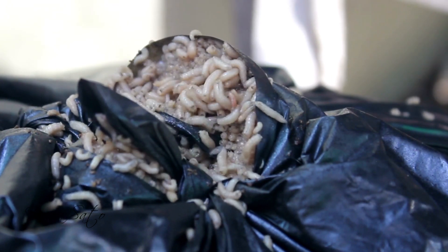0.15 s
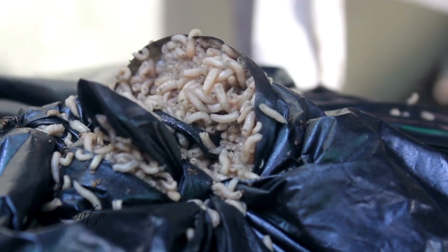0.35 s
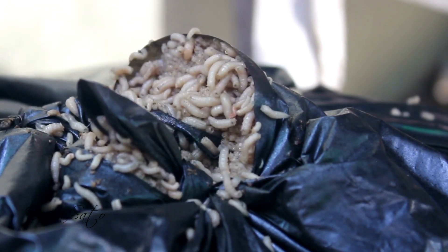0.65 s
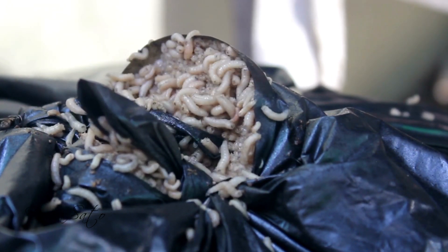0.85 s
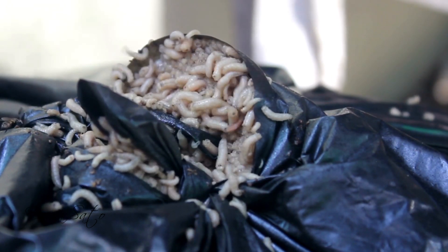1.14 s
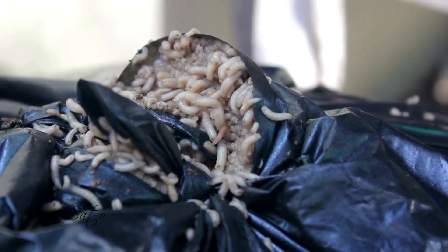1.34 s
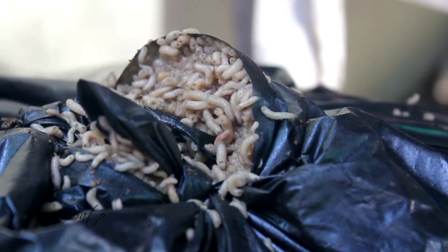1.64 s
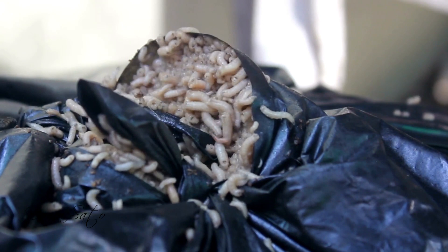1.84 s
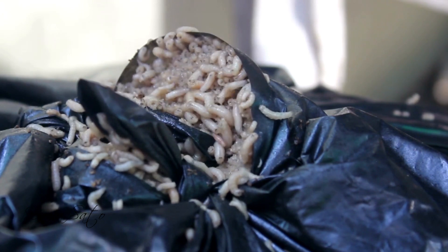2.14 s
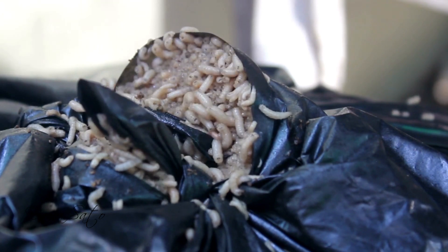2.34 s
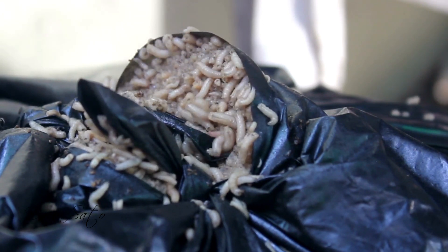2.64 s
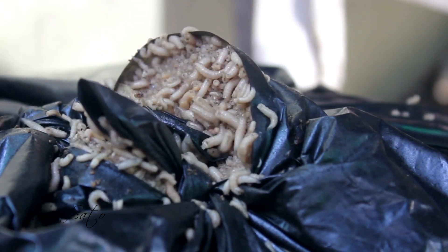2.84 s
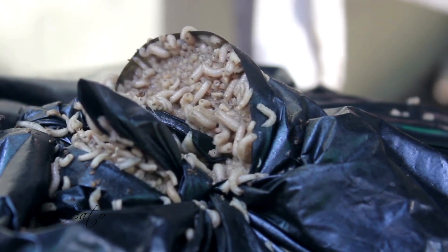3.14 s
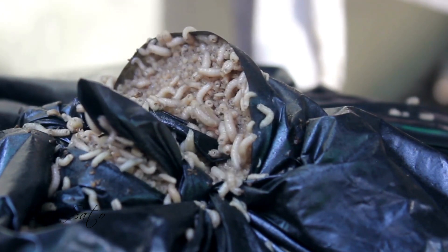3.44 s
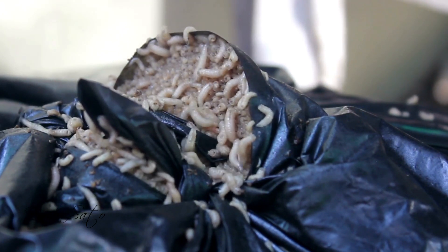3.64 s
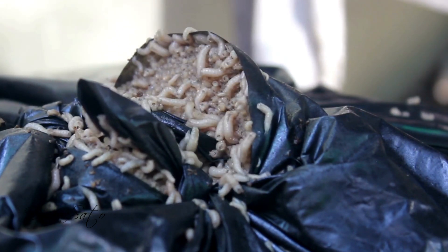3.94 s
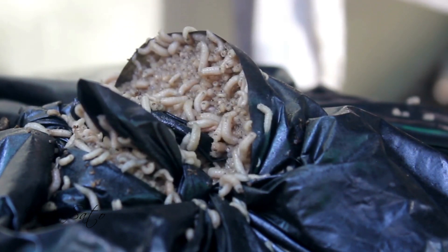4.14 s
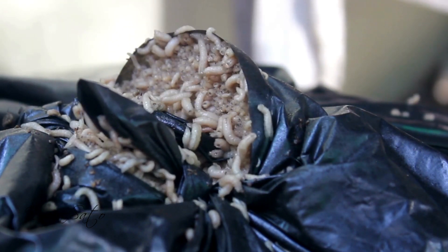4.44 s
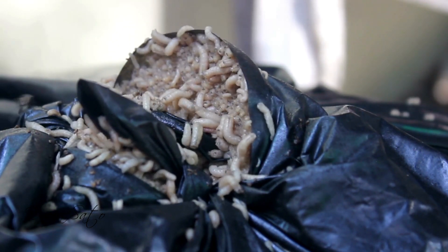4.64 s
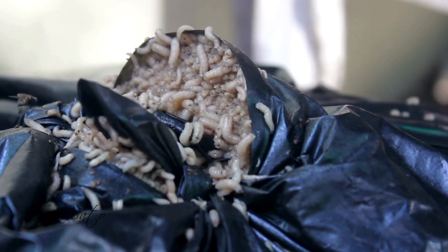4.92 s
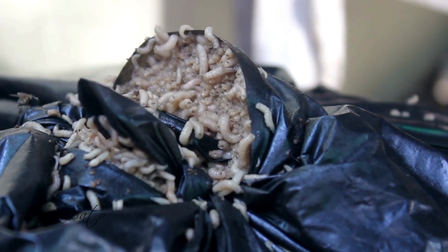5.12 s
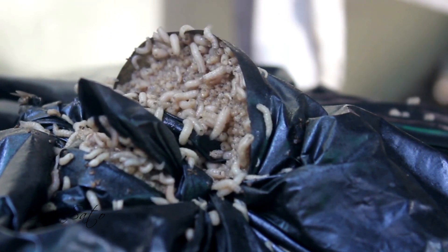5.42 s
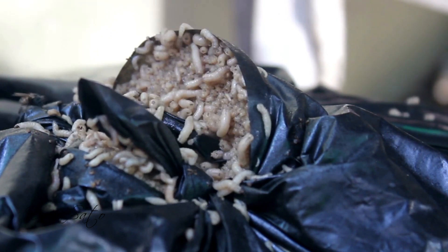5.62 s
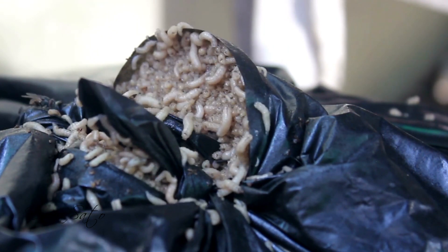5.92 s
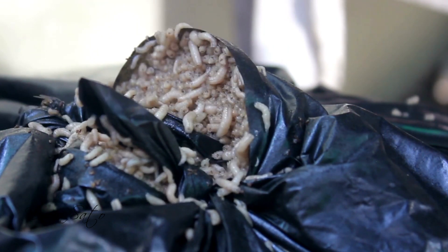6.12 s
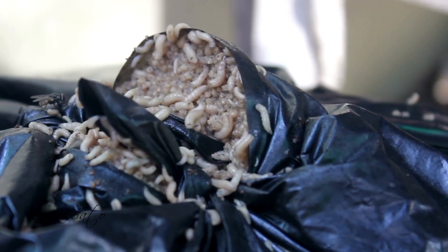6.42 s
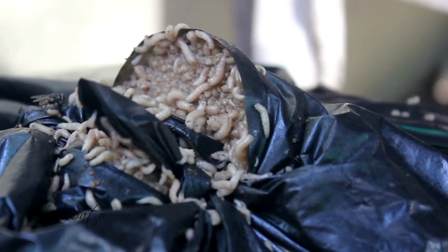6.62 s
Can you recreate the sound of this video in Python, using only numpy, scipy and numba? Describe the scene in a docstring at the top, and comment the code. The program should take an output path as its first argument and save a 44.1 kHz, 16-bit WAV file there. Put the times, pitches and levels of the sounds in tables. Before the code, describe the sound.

Very close stereo pickup of small larvae squirming in damp bran inside a plastic bag. Thousands of tiny wet pops a second merge into an even, bright crackle over a soft hiss, like fine rain or fizz. Irregular sharper snaps jump out on both sides, with minute echoes in the plastic folds. The texture runs unbroken from start to end, with no background activity.

```python
"""Small larvae wriggle in a heap of damp bran inside a plastic bag, close to a stereo microphone.
Sticky contacts part and flakes snap: thousands of tiny pops a second, each a sine that swells and dies in a few cycles.
Nearby pops stand out with a snap, shreds and short echoes among the folds; brief gliding whistles join them.
The farthest pops blur into a hiss, made of patchy noise whose treble flickers."""
import sys
import numpy as np
from scipy import signal
from scipy.fft import rfft, irfft, next_fast_len
from scipy.io import wavfile
from scipy.ndimage import uniform_filter1d, map_coordinates
from numba import njit

SR = 44100
rng = np.random.default_rng(int(sys.argv[2]) if len(sys.argv) > 2 else 0)


def to_wav(sig):
    """Store sig (one row per channel, or 1-D mono) as 16-bit WAV at the path in sys.argv[1].

    Samples outside -1..1 are clipped; the rate is SR.
    """
    pcm = np.clip(np.atleast_2d(sig), -1, 1) * 32767
    pcm = np.round(pcm).astype(np.int16)
    wavfile.write(sys.argv[1], SR, pcm.T)  # frames by channels


N = 298557  # samples


def amp(db):
    """Decibels to an amplitude factor."""
    return 10 ** (np.asarray(db) / 20)


def unit(x):
    """Scale x to an RMS of 1."""
    return x / np.sqrt(np.mean(x ** 2) + 1e-20)


def along(points, hz):
    """Read (Hz, value) points on a log frequency axis."""
    point_hz, value = np.transpose(points)
    return np.interp(np.log(hz + 1), np.log(point_hz + 1), value)


def curves(rows):
    """One value per sample for each column after the time."""
    s, *columns = np.transpose(rows)
    return [np.interp(np.arange(N) / SR, s, column) for column in columns]


def wobble(rate):
    """A smooth random curve, rate knots a second."""
    knots = rng.standard_normal(int(N * rate / SR) + 4)
    return map_coordinates(knots, [np.arange(N) * rate / SR])


def patches(s, hz, rate, per_octave):
    """A smooth random field over time and pitch, read at each pop; rate is in knots a second."""
    knots = rng.standard_normal((int(N * rate / SR) + 4, 24))
    return map_coordinates(knots, [s * rate, np.log2(hz / 100) * per_octave])


def filtered(x, response):
    """x times a response of frequency."""
    m = next_fast_len(N + 8192)
    return irfft(rfft(x, m) * response(np.fft.rfftfreq(m, 1 / SR)), m)[..., :N]


@njit
def add_rings(out, peak, step, rise, left, right):
    """Sines that swell for rise samples and die away, each summed into both channels."""
    for k in range(len(peak)):
        first = peak[k] - rise[k]
        for n in range(max(int(first) + 1, 0), min(int(first + 8 * rise[k]), out.shape[1])):
            u = (n - first) / rise[k]
            v = u * np.exp(1 - u) * np.sin(step[k] * (n - first))
            out[0, n] += left[k] * v
            out[1, n] += right[k] * v


def pops(s, db, hz, cycles, pan_db, sign):
    """Stereo sum of pops whose swell peaks at s after 0.4 * cycles of ringing, one sample at least."""
    out, lean = np.zeros((2, N)), amp(pan_db)
    size = sign * amp(db) * 2 / (1 + lean)  # the mean of both channels keeps the level
    rise = np.maximum(.4 * cycles / hz * SR, 1)
    add_rings(out, s * SR, 2 * np.pi * hz / SR, rise, size * lean, size)
    return out


# Activity of the whole heap, for crackle and hiss alike; positive pan is left.
# Columns: start_s [s], level_db [dB before the mix], pan_db [dB, left over right]
ACTIVITY = [(0, -31.5, 0), (.3, -31, 0.5), (1, -31, 1.5), (1.55, -30, -0.8), (2.1, -31.5, 0),
            (2.8, -32.5, -0.5), (3.15, -32.5, 0), (3.45, -31, 0), (3.78, -32.5, 1.5), (4, -31, -0.8),
            (4.38, -30.5, -1.5), (4.9, -31, -1), (5.18, -32.5, -1.5), (5.4, -30, 0.5), (5.7, -31.5, -0.5),
            (6.27, -31.5, -0.5), (6.32, -31.5, 2.5), (6.45, -30.5, 0.5), (6.5, -32.5, 0.5), (6.77, -30, 2)]
# Tone filter over the small pops. Columns: pitch_hz [Hz], gain_db [dB]
CRACKLE_COLOUR = [(40, -55), (120, -47), (300, -25.5), (550, -17.5), (1100, -7), (2600, 1.5), (5200, 7),
                  (8500, 9.5), (12000, 6), (15500, 7)]


def crackle(surge_db, count, centre_hz, octaves, cycles, spread_db, top_db, side_db, clump_db):
    """Countless small pops from the left, middle and right of the heap, louder in clumps of like pitch."""
    TILT_DB, TILT_DRIFT_DB, TILT_RATE = -0.87, 0.5, 4.12  # dB per octave, its random drift, knots a second
    when, size, place, sign = rng.random((count, 4)).T
    pitch, life, lean = rng.standard_normal((count, 3)).T
    at = (when * (N - 1)).astype(int)
    level_db, pan_db = (column[at] for column in curves(ACTIVITY))
    tilt_db = TILT_DB + TILT_DRIFT_DB * wobble(TILT_RATE)[at]
    hz = np.clip(centre_hz * 2 ** (octaves * pitch), 120, .4 * SR)
    strength_db = top_db * np.tanh(-spread_db * np.log(size + 1e-9) / top_db)  # random, held below top_db
    slow_clumps = patches(at / SR, hz, 12, 1.214)
    quick_clumps = patches(at / SR, hz, 40, 1.215)
    clumps = clump_db * (slow_clumps + 2.2 * quick_clumps)
    db = level_db + surge_db[at] + strength_db + clumps + tilt_db * np.log2(hz / 4000)
    pan = pan_db + side_db * np.round(3 * place - 1.5) + 1.6 * lean
    fizz = pops(at / SR, db, hz, cycles * np.exp(0.62 * life), pan, np.sign(sign - .5))
    fizz = unit(filtered(fizz, lambda f: amp(along(CRACKLE_COLOUR, f))))
    return fizz * np.sqrt(np.mean(amp(level_db) ** 2))


# Tone filter for the blur of far pops. Columns: pitch_hz [Hz], level_db [dB per Hz, relative]
HISS_COLOUR = [(18, -88), (30, -42), (98, -35.5), (569, -9), (1280, -2.5), (2610, 0.5), (5450, -1),
               (8740, -6.5), (14800, -15), (16000, -33)]
# Likeness of the hiss at the two sides. Columns: pitch_hz [Hz], likeness [1 = identical]
HISS_LIKENESS = [(60, 0.23), (240, 0.59), (950, 0.77), (3770, 0.82), (15000, 1)]


def hiss(patchy_db, flicker_db):
    """Pops too far and too many to tell apart: patchy noise whose treble flickers as a whole."""
    hz, t, z = signal.stft(rng.standard_normal((2, N)), SR, nperseg=512)
    field = uniform_filter1d(rng.standard_normal(z.shape[1:]), 8, 0)
    field = uniform_filter1d(field, 6, 1)
    flicker = np.interp(t * SR, np.arange(N), wobble(8) + 1.1 * wobble(22))
    gain_db = patchy_db * unit(field) + flicker_db * np.outer(hz / 12000, flicker)
    pair = signal.istft(z * amp(gain_db), SR, nperseg=512)[1][:, :N]

    def mid_side(f):
        turn = np.arccos(np.clip(along(HISS_LIKENESS, f), -1, 1)) / 2
        return amp(along(HISS_COLOUR, f)) * [np.cos(turn), np.sin(turn)]

    mid, side = filtered(pair, mid_side)
    level_db, pan_db = curves(ACTIVITY)
    return amp(level_db + np.outer([.5, -.5], pan_db)) * unit(np.array([mid + side, mid - side]))


# The loudest pops, close to the microphone; levels are for the ring alone, before filter and mix.
# Columns: peak_s [s], level_db [dB], pitch_hz [Hz], pan_db [dB, left over right]
NEAR_POPS = [(0.073, -18, 5700, 4), (0.1815, -21.5, 12750, -8), (0.235, -15, 11900, 4),
             (0.3875, -16, 10170, 1), (0.4071, -22, 13000, 0), (0.4424, -20, 6800, -8),
             (0.45, -15, 2740, 10), (0.4908, -13, 6790, -1), (0.53, -14, 7300, -5), (0.5303, -23, 2530, -4),
             (0.6327, -13, 10170, 1), (0.641, -19, 9700, 2), (0.7912, -12, 7600, -1),
             (0.8608, -13, 9000, 6), (0.891, -23.5, 1780, 6), (0.9052, -15, 9500, -9),
             (0.9063, -12, 4430, 0), (0.9112, -21, 11200, 0), (0.9226, -24, 1380, 10),
             (0.9238, -19, 4000, 0), (0.9347, -23, 3900, 0), (0.9435, -17, 3900, 0), (0.9497, -22, 5400, 0),
             (0.982, -12.5, 4170, -1), (1.029, -12, 10100, -12), (1.0849, -17, 12100, 15),
             (1.104, -15, 6400, 3), (1.2342, -7.5, 5600, 0), (1.2596, -11, 5800, 1),
             (1.2774, -16.5, 3400, 7), (1.2946, -14, 14380, 1), (1.3005, -13, 6860, 1),
             (1.3084, -23, 12260, 0), (1.36, -12.5, 6410, 0), (1.4094, -12, 8600, -4),
             (1.4149, -15.5, 4900, -12), (1.4501, -17, 10040, 1), (1.4683, -12, 4800, -1),
             (1.475, -15, 3920, 8), (1.5195, -18, 5500, 0), (1.5255, -21, 10500, 0), (1.538, -17, 4280, 14),
             (1.603, -13.5, 2130, -2), (1.6033, -23, 6600, 0), (1.6486, -21, 1920, -3),
             (1.6633, -14, 5090, 7), (1.675, -20, 7000, 0), (1.7032, -8.5, 3900, 7),
             (1.7089, -18, 11000, 10), (1.725, -20, 2670, -7), (1.736, -15, 4500, 0),
             (1.7395, -10, 4800, 6), (1.759, -20, 5200, 0), (1.825, -16, 6300, 0), (1.829, -7.5, 4530, 6),
             (1.8536, -14, 2670, -2), (1.8554, -8.5, 7160, 10), (1.86, -12, 4830, 6),
             (1.8694, -20, 2530, 0), (1.882, -13, 4770, 12), (1.976, -16, 5390, -2), (1.978, -15, 5090, 11),
             (2.022, -18, 13900, 0), (2.1921, -19, 14380, -14), (2.209, -25, 2550, 0),
             (2.248, -27, 1450, 0), (2.257, -28, 1150, 0), (2.2647, -24, 9550, 5), (2.267, -25, 1750, 0),
             (2.282, -28, 1050, 0), (2.37, -21, 2500, 0), (2.4023, -19, 5250, 8), (2.4095, -25, 6200, 0),
             (2.4262, -11, 8200, -1), (2.4465, -19, 6800, 0), (2.4511, -16, 7190, -3),
             (2.4653, -16, 10270, -4), (2.478, -23, 3500, 0), (2.499, -24, 8700, 0),
             (2.505, -11.5, 6850, -1), (2.505, -18, 3360, -2), (2.5277, -17, 6800, 6),
             (2.534, -14, 5600, 10), (2.5712, -18, 5750, 3), (2.7587, -15, 8550, -1),
             (2.8465, -19, 14380, -2), (2.8859, -17, 6500, 0), (3.0185, -19, 12600, 0),
             (3.0414, -34, 700, -1), (2.9685, -24, 3400, 0), (2.991, -23, 5000, 0), (3.0205, -23, 6100, 0),
             (3.0486, -19, 9500, -2), (3.0495, -21, 5000, 0), (3.0675, -24, 2700, 0),
             (3.0985, -18, 7900, -6), (3.1015, -19, 12080, 9), (3.1643, -16, 7000, 0),
             (3.1841, -18, 11000, -15), (3.2128, -19, 14380, -15), (3.273, -14, 5090, -2),
             (3.2739, -20, 1370, 0), (3.3273, -14, 6100, -7), (3.3494, -16, 4530, 1),
             (3.3802, -29.5, 920, -4), (3.3829, -15.5, 6640, 4), (3.4183, -19, 4630, 7),
             (3.4334, -29, 885, -8), (3.4677, -31.5, 760, -5), (3.486, -31.5, 790, -4),
             (3.5271, -15, 8100, 0), (3.5694, -28, 6600, 5), (3.667, -16, 4200, -1), (3.672, -13, 1620, -7),
             (3.7059, -20, 13000, 7), (3.7575, -15.5, 2510, -5), (3.759, -18.5, 1800, -4),
             (3.7635, -20, 3500, 0), (3.7835, -15, 9900, -8), (3.8262, -17, 6950, 4),
             (3.8397, -12.5, 6410, 11), (3.8974, -24, 1810, -10), (3.8964, -13.5, 6940, 10),
             (3.91, -20, 14300, -4), (3.9256, -16, 12810, 6), (3.999, -18, 4650, -1),
             (4.016, -21.5, 1530, -9), (4.0256, -7, 5400, -8), (4.031, -24, 1760, -11),
             (4.052, -9, 7500, -6), (4.06, -12.5, 8000, -6), (4.095, -10, 7930, 2),
             (4.096, -21.5, 1890, -9), (4.1517, -15, 6050, -16), (4.157, -25, 12500, 0),
             (4.18, -15, 4040, 12), (4.196, -23, 12450, 14), (4.21, -21, 12450, 14), (4.241, -12, 4820, 0),
             (4.2561, -17, 2310, -7), (4.2565, -18, 9730, -5), (4.2716, -11, 6100, -1),
             (4.2993, -15, 4530, -8), (4.3131, -14, 3580, -9), (4.3946, -26, 13200, 0),
             (4.407, -14.5, 5800, -2), (4.43, -15, 4500, -2), (4.4697, -16, 5090, 3),
             (4.4807, -20, 11420, -14), (4.483, -15.5, 1390, -9), (4.5857, -18, 1780, -9),
             (4.625, -14, 7950, -5), (4.727, -10, 2350, -11), (4.738, -14, 3500, -2),
             (4.7635, -13.5, 7150, -1), (4.788, -11, 3100, -9), (4.7959, -20, 5050, -2),
             (4.8013, -17, 5390, 7), (4.8043, -21, 2760, -3), (4.806, -16.5, 8550, 1),
             (4.8802, -17, 5060, -5), (4.8856, -16, 3200, -8), (4.988, -19.5, 1480, -8),
             (5.001, -11.5, 5090, -9), (5.027, -15, 2580, -8), (5.032, -21, 2140, -4),
             (5.039, -16, 4800, 10), (5.103, -19, 6570, 1), (5.1047, -18, 11420, -4), (5.1568, -31, 740, 0),
             (5.171, -37, 690, 0), (5.193, -37, 680, 3), (5.2385, -16, 6970, -1), (5.2452, -14, 4000, -6),
             (5.27, -20, 3390, -8), (5.3208, -18, 14380, 15), (5.352, -12, 9230, 2), (5.4673, -16, 9360, 0),
             (5.5697, -15, 7160, 2), (5.6477, -17, 2440, -10), (5.6587, -21.5, 1900, -9),
             (5.6605, -21, 11900, 0), (5.7544, -14, 7190, 6), (5.8463, -14, 3810, -1),
             (5.9204, -16, 3310, -7), (5.961, -20, 2960, 1), (5.9835, -21, 6000, 0), (6.0555, -20, 7700, 0),
             (6.1105, -19, 2200, 0), (6.125, -17, 3380, -9), (6.135, -21, 2600, -5), (6.163, -21, 2500, 0),
             (6.173, -20, 2900, 8), (6.1765, -17, 3200, 8), (6.2196, -19, 3390, 6), (6.2885, -22, 4400, 0),
             (6.3173, -21, 13580, 16), (6.3212, -14, 4670, -1), (6.345, -20, 5200, 0),
             (6.3495, -22, 13000, 0), (6.3574, -24, 11800, -9), (6.388, -17, 4300, 0),
             (6.411, -24, 4000, 0), (6.433, -13, 7190, 3), (6.4512, -16, 7010, 1), (6.467, -20, 3000, 0),
             (6.4973, -20, 12450, -8), (6.5144, -10.5, 8550, -9), (6.5557, -20, 6750, 8),
             (6.6296, -19, 12800, 0), (6.7134, -19, 11000, 8)]


def loud_pops(count):
    """Single contacts that tear loose near the microphone: a ring with a short broad snap and ragged shreds."""
    # count lesser pops fall at random moments, softer away from the middle pitch
    LESSER_DB, LESSER_HZ, LESSER_OCTAVES, LESSER_SIDE_DB = -23.5, 5630, 0.73, 12
    LESSER_TILT_DB = 3  # dB lost per octave either way
    RING_CYCLES = 2.3
    LONG_RING_HZ, MORE_CYCLES = 6370, 1.05  # above this pitch rings gain cycles per octave
    WET_RING_HZ, WET_CYCLES = 4000, .7  # wet pockets gain cycles over the first octave below this pitch
    SNAP_DB, SNAP_SCATTER_DB = -10, 1.5  # against the ring's peak
    SHRED_DB, SHRED_OCTAVES, SHRED_CYCLES = -10.5, .28, 2.6  # against the ring; scatter of pitch and time
    size, pitch, place = rng.standard_normal((count, 3)).T
    lesser_s = rng.random(count) * N / SR
    lesser_db = LESSER_DB + 3.7 * size - LESSER_TILT_DB * LESSER_OCTAVES * np.abs(pitch)
    lesser_hz = np.clip(LESSER_HZ * 2 ** (LESSER_OCTAVES * pitch), 600, 14500)
    lesser = [lesser_s, lesser_db, lesser_hz, LESSER_SIDE_DB * place]
    s, db, hz, pan_db = np.hstack([lesser, np.transpose(NEAR_POPS)])
    ring, crack, sharp = rng.standard_normal((len(s), 3)).T
    cycles = RING_CYCLES + MORE_CYCLES * np.maximum(np.log2(hz / LONG_RING_HZ), 0)
    cycles = cycles + WET_CYCLES * np.clip(np.log2(WET_RING_HZ / hz), 0, 1)
    snap_hz = np.where(hz < 8000, np.minimum(1.8 * hz, 12000), hz / 2)  # over low rings, under high ones
    snap_db = db + SNAP_DB + SNAP_SCATTER_DB * sharp
    snap = pops(s, snap_db, snap_hz, np.full(len(s), 1.6), pan_db, np.sign(crack))
    near = pops(s, db, hz, cycles, pan_db, np.sign(ring)) + snap
    for late, detune, loud in rng.standard_normal((len(s), 3, 2)).T:  # ragged shreds around and after the ring
        shred_s = s + SHRED_CYCLES * (late + .5) / hz
        shred_hz = np.minimum(hz * 2 ** (SHRED_OCTAVES * detune), 15000)
        near = near + pops(shred_s, db + SHRED_DB + 2 * loud, shred_hz, cycles, pan_db, np.sign(late))
    return filtered(near, lambda f: (1j * f / (1j * f + 200)) ** 3)  # sources this small radiate no bass


# Echoes among the folds of the bag. Columns: pitch_hz [Hz], t60_s [s, time to fall 60 dB]
BAG_DECAY = [(500, 0.015), (3000, 0.061), (12000, 0.066)]


def folds(x):
    """A short scatter of echoes, as decaying noise; each frequency dies at its own speed."""
    hz, t, z = signal.stft(rng.standard_normal((2, 2048)), SR, nperseg=64)
    decay = amp(-60 * t / along(BAG_DECAY, hz)[:, None])
    tail = signal.istft(z * decay, SR, nperseg=64)[1]
    return signal.fftconvolve(x, tail / np.linalg.norm(tail[0]), axes=1)[:, :N]


# Air squeezed through a wet gap; levels are before the waver and the mix.
# Columns: start_s [s], length_s [s], first_hz [Hz], last_hz [Hz], level_db [dB], pan_db [dB, left over right]
WET_GAPS = [(1.48, 0.012, 3920, 4400, -30, 4), (1.495, .01, 3800, 3500, -31, 0),
            (1.664, .01, 5300, 5000, -29, 0), (1.67, .009, 4000, 4100, -27, 0),
            (2.529, 0.013, 5590, 4500, -26, 4), (3.202, .0115, 6500, 7900, -28.5, -3),
            (5.283, .028, 867, 700, -40, 11), (5.3, 0.01, 1420, 1140, -31, 6),
            (5.319, .014, 800, 780, -37, 11), (6.125, .012, 3250, 2590, -28, -7),
            (6.44, .006, 7700, 8600, -25, 0)]


def squeaks():
    """Air through wet gaps: brief sines of unsteady level that glide from one pitch to another."""
    out, waver = np.zeros((2, N)), amp(2.2 * wobble(600))
    for s, length, first_hz, last_hz, db, pan_db in WET_GAPS:
        u, at = np.linspace(0, 1, int(length * SR)), int(s * SR)
        phase = 2 * np.pi * np.cumsum(first_hz + (last_hz - first_hz) * u) / SR
        tone = np.sin(phase) * np.sqrt(np.sin(np.pi * u).clip(0))
        sides = amp(db + np.outer([.5, -.5], pan_db))
        out[:, at:at + len(u)] += sides * tone * waver[at:at + len(u)]
    return out


# The low rustle of the heap swells and sinks. Columns: start_s [s], gain_db [dB]
RUSTLE_SWELL = [(0, -1), (.6, 0.5), (1.8, -1.5), (2.1, 0.5), (2.5, 4.5), (2.8, -0.5), (3.2, 1), (3.47, 2.2),
                (3.7, 1), (4.6, -0.5), (5.2, 0), (5.6, -0.5), (6.77, 0)]


def swell_lows(bed):
    """The change that the swelling rustle makes to the bed, mostly below 900 Hz."""
    lows = filtered(bed, lambda hz: 1 / (1 + (hz / 900) ** 4))
    return lows * (amp(curves(RUSTLE_SWELL)[0]) - 1)


def flicker_bass(heap):
    """The level flickers at random below about 200 Hz, 15 knots a second."""
    bass = filtered(heap, lambda hz: 1 / (1 + (hz / 200) ** 6))
    return heap - bass + bass * amp(7 * wobble(15) - 4.5)


def scene():
    """Mix the heap: small pops and hiss surge together, near pops and squeaks echo in the folds."""
    surge_db = 0.7 * wobble(14) + 1.5 * wobble(120)  # slower surges and brief bursts
    wet = crackle(surge_db, count=34000, centre_hz=3608, octaves=1.201, cycles=2.427,
                  spread_db=4.2, top_db=7.5, side_db=12.0, clump_db=1)
    flakes = crackle(surge_db, count=4000, centre_hz=11700, octaves=0.2, cycles=2.15,
                     spread_db=7, top_db=1.5, side_db=2.5, clump_db=1.2)
    ticks = crackle(surge_db, count=500, centre_hz=4960, octaves=0.38, cycles=0.63,
                    spread_db=1.0, top_db=2, side_db=10, clump_db=0.2)  # broad, ringless
    far = amp(-3.0 + 0.26 * surge_db) * hiss(patchy_db=1.75, flicker_db=0.86)
    bed = amp(-2.0) * wet + amp(-13.0) * flakes + amp(-15.5) * ticks + far
    loud = loud_pops(count=20) + squeaks()
    heap = bed + swell_lows(bed) + amp(-2.5) * loud + amp(-7.5) * folds(loud)
    return flicker_bass(heap)


def record(dry):
    """The recorder keeps nothing from 15760 Hz up."""
    return filtered(dry, lambda hz: hz < 15760)


dry = scene()
out = record(dry)
to_wav(out)
```